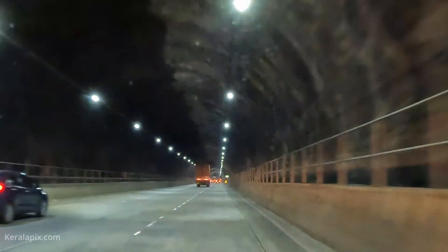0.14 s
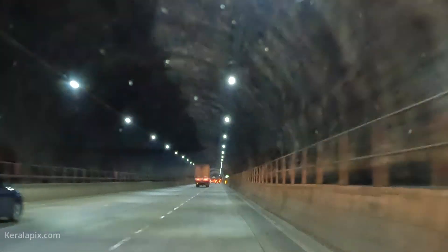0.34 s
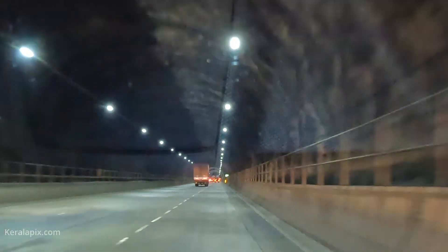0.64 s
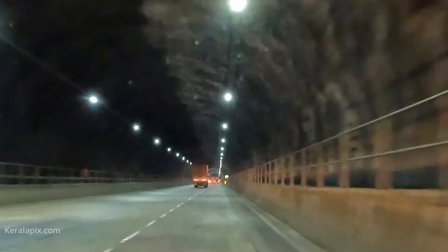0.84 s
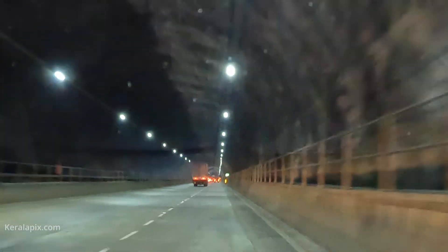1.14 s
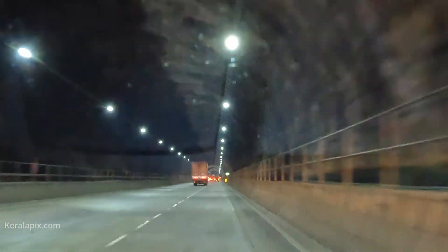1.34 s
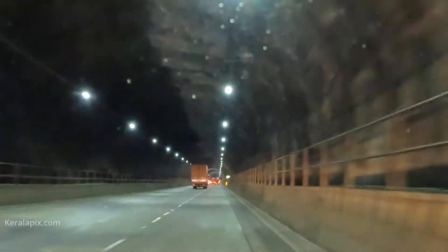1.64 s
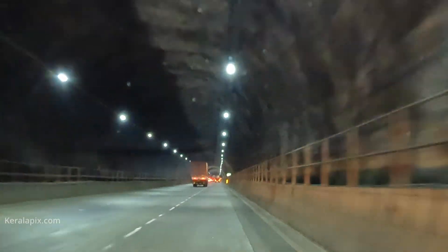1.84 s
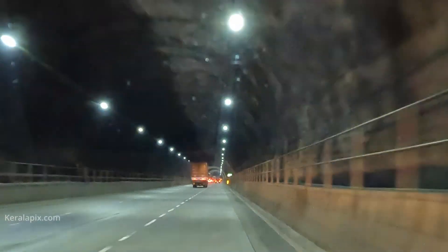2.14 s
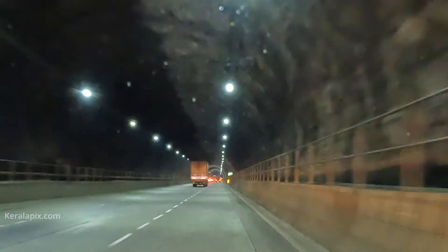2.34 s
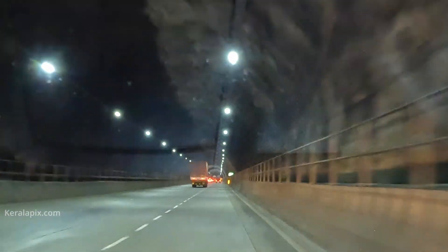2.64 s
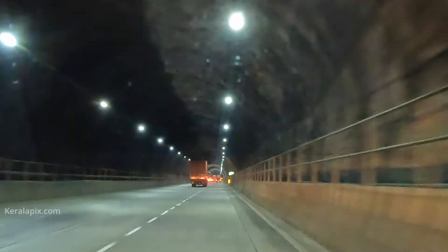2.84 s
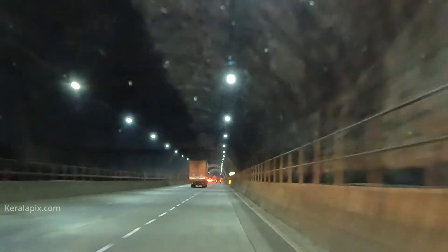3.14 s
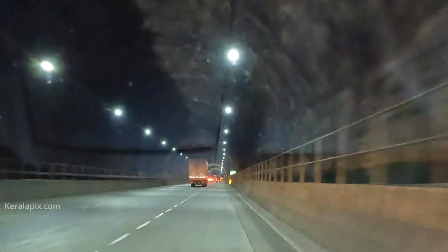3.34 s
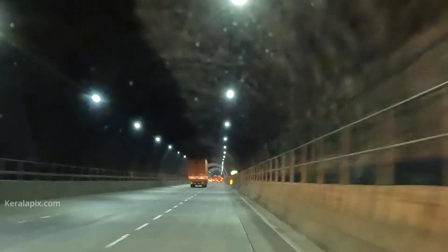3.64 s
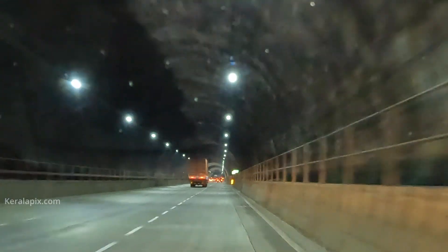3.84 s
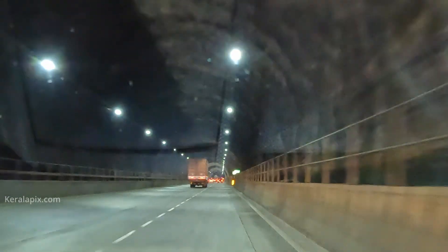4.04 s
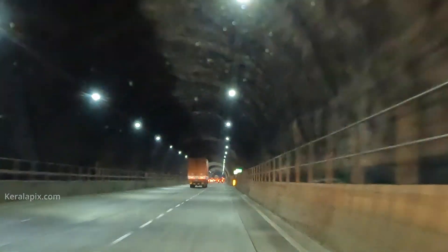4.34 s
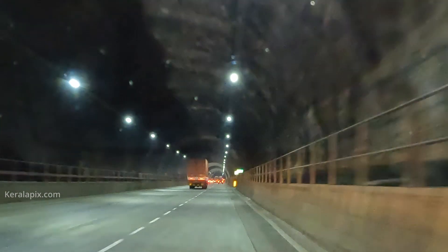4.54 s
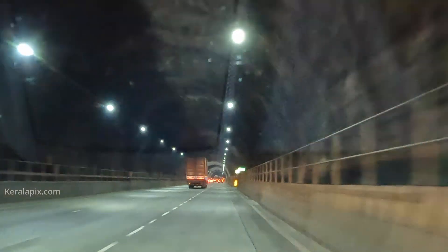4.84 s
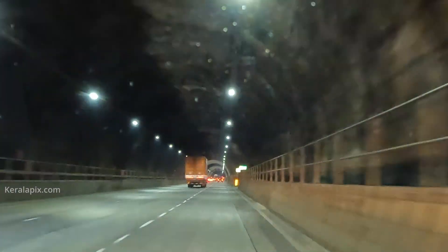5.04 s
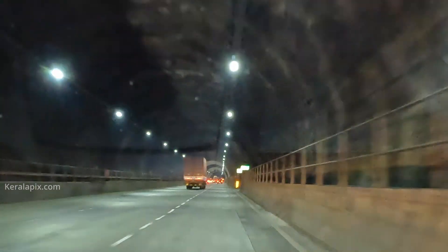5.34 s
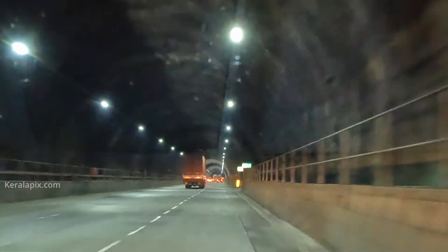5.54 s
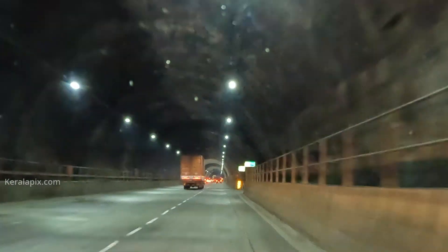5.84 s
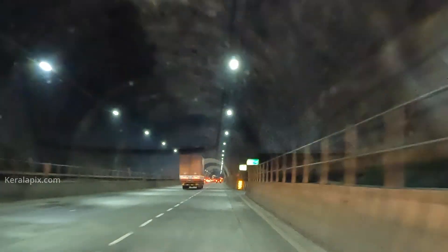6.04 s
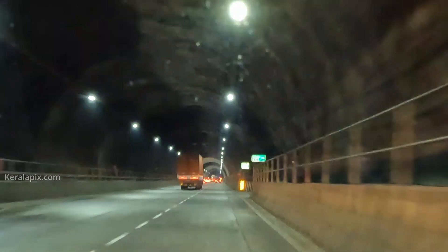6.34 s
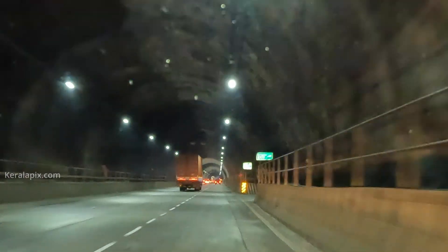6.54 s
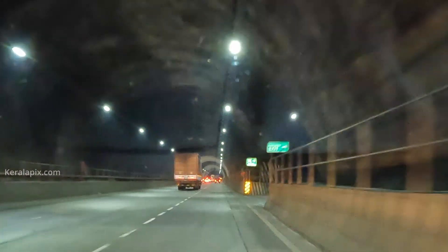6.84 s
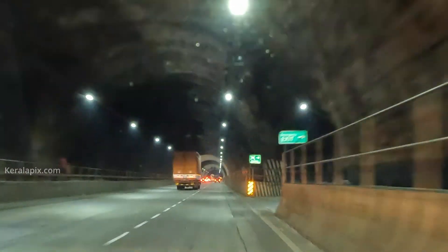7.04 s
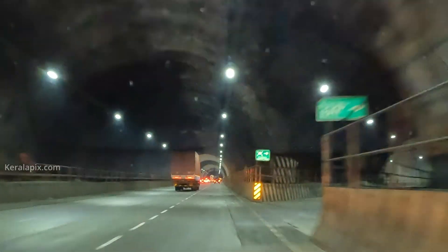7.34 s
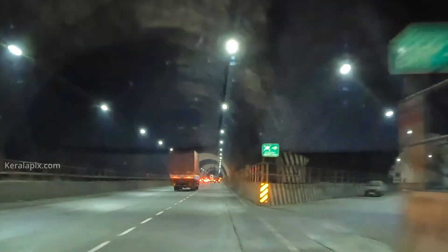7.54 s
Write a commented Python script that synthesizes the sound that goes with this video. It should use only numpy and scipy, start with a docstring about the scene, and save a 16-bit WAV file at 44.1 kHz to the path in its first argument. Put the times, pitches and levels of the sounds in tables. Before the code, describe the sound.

Heard from the dashboard of a car at steady speed in a tunnel. Heavy bass shudder and cabin boom swell over small bumps, with a thick tyre drone above. A muffled tunnel roar and soft hiss stay behind. Loose plastic trim chirps in very short, high, dry squeaks throughout, sometimes in rapid clusters.

```python
"""A car cruises through a road tunnel, heard inside: its body shakes on bumps and the cabin air booms.
A low hum rises and falls, and noise shaped by panel resonances makes the thrum and drone of the tyres.
Outside, the tunnel roars and hisses in bands of noise, with a faint whine that comes and goes.
Loose plastic trim chirps in short squeals with scraping noise, and nearby surfaces echo each chirp."""
import sys
import numpy as np
from scipy import signal
from scipy.fft import rfft, irfft
from scipy.io import wavfile
from scipy.ndimage import uniform_filter1d, minimum_filter1d

SR = 44100
rng = np.random.default_rng(int(sys.argv[2]) if len(sys.argv) > 2 else 0)


def generate_wav(sig):
    """Save sig (samples, or channels by samples) to the path in sys.argv[1] as 16-bit PCM at SR."""
    pcm = np.round(np.clip(np.atleast_2d(sig).T, -1, 1) * 32767).astype(np.int16)
    wavfile.write(sys.argv[1], SR, pcm)


N = 338684
TIME = np.arange(N) / SR
SIDES = np.array([[1], [-1]])  # left, right

# In spectrum tables only the shape counts: each noise is later set to its own level.
# bumps in the road, each a short swell of the body shake: time_s, rise_db (a minus is a dip)
BUMPS = [(.15, 3.5), (.49, 3.5), (1.25, 7), (1.71, 5.5), (2.06, 3), (2.43, -1.5), (3.8, -1), (3.97, 9),
         (4.95, 3.5), (5.21, 4.5), (5.59, 8), (6.04, 7.5), (6.6, 4), (6.779, 8), (7.38, 5.5), (7.62, 8)]
BUMP_S, SHAKE_DB = 0.085, -23.5  # width of a swell, shake level between bumps
# boom of the cabin air as the road shakes the body: time_s, level_db, pitch_hz
BOOM = [(0.0, -20, 45.95), (0.35, -18.5, 48), (0.45, -12.5, 43.28), (0.83, -19, 54.17), (1.12, -16, 44.32),
        (1.25, -29, 52.07), (1.44, -21.5, 55.88), (1.57, -10.5, 44.08), (1.68, -24, 46.84),
        (1.89, -13, 44.9), (2.03, -18.5, 46.16), (2.19, -16.5, 48.02), (2.37, -18, 46.93),
        (2.59, -13.5, 45.05), (2.65, -21.5, 48.05), (2.71, -13.5, 43.2), (2.85, -9.5, 41.03),
        (3.07, -12, 46.14), (3.31, -22.5, 51.96), (3.49, -13.5, 42.96), (3.73, -17, 45.84),
        (3.81, -27, 47.96), (3.86, -19.5, 47.1), (3.92, -24.5, 45.04), (4.03, -9, 45), (4.16, -19.5, 49.45),
        (4.27, -12, 45.1), (4.51, -19, 46.1), (4.61, -23.5, 53.93), (4.77, -20, 52.83), (4.86, -24.5, 51.8),
        (5.1, -12, 48.96), (5.2, -22, 53.2), (5.28, -20.5, 56.65), (5.36, -23, 58.17), (5.47, -13.5, 54.3),
        (5.57, -18, 44.02), (5.73, -16.5, 52.89), (6.03, -16, 45.17), (6.24, -14.5, 52.8),
        (6.35, -20, 46.85), (6.43, -14.5, 60.2), (6.59, -19, 60.84), (6.7, -21.5, 54.63),
        (6.85, -23.5, 47.2), (7.01, -17, 46.05), (7.28, -17, 55.17), (7.33, -18.5, 49.05),
        (7.49, -14.5, 52.65), (7.68, -21.0, 56.96)]
# low hum near 90 Hz: time_s, level_db
LOW_HUM = [(0, -25), (.3, -40.5), (.9, -30.5), (1.15, -34.5), (1.7, -29), (2.4, -36.5), (2.65, -31),
           (3.28, -28.5), (3.58, -45), (3.9, -29.5), (4.15, -33.5), (4.33, -20.5), (4.65, -33.5),
           (4.85, -27), (5.15, -37.5), (5.4, -28), (5.6, -33), (5.78, -24), (5.98, -37), (6.13, -18.5),
           (6.3, -39), (6.55, -27.5), (7.2, -33.5), (7.45, -41), (7.68, -24.5)]
# loose rumble of the suspension: frequency_hz, density_db (per Hz)
RUMBLE_SPECTRUM = [(30, -5), (38, 2), (45, -4.5), (55, -8), (66, -1), (78, -18)]
RUMBLE_DB = -8  # against the boom

# road surface under the tyres, before flutter and thumps: time_s, thrum_db, drone_db
SURFACE = [(0, -22, -31.5), (.55, -27, -34.5), (.8, -20, -31.5), (1.2, -22.5, -33), (1.6, -20, -32),
           (2.05, -26, -30.5), (2.6, -22.5, -34.5), (2.92, -26, -33), (3.3, -23.5, -33.5), (3.48, -27, -32),
           (3.87, -23, -31.5), (4.1, -24, -30.5), (4.42, -24.5, -30), (4.75, -20.5, -31),
           (5.1, -23.5, -29.5), (5.4, -21.5, -30), (5.92, -26.5, -32.5), (6.25, -21.5, -31.5),
           (6.6, -24.5, -32), (6.82, -27, -35.5), (7.25, -22.5, -29.5), (7.68, -26.5, -34.5)]
# rough patches that the tyres hit, each a brief thump: time_s, rise_db
THUMPS = [(.38, 3), (.75, 1.5), (1.35, 3), (1.52, 2), (1.74, 2.5), (2.3, 3), (2.64, 5), (3.14, 1), (3.3, 3),
          (3.84, 4), (4.27, 4), (4.63, 2), (4.87, 1.5), (5.36, 2), (5.73, 2), (6.23, 3.5), (7.48, 4)]
THUMP_S = 0.03
# low and higher tyre noise: frequency_hz, density_db (per Hz)
THRUM_SPECTRUM = [(32, -10.5), (66, 6.5), (80, 1), (100, 0), (120, -2), (145, -5.5), (180, -14),
                  (230, -37.5)]
DRONE_SPECTRUM = [(130, -32.5), (185, 2), (230, 1), (280, -1.5), (340, -3.5), (400, -10.5), (430, -13),
                  (500, -19.5), (700, -42.5)]
# panel resonances of the cabin: frequency_hz, width_hz, gain_db (a minus is a dip)
CABIN_MODES = [(99, 8.7, 2.5), (113.2, 3.3, 6.5), (134, 8.3, -3), (161, 38, 5.5), (209.6, 27, 4.5),
               (224, 15, -2), (252.3, 19, 5.5), (311, 22, 3), (353.2, 16, 6.5), (384.3, 12, 6.5),
               (458.4, 26, 6)]
# the air inside the tyres hums at two close pitches: time_s, lower_hum_db, upper_hum_db
HUMS = [(0, -40, -36.5), (.6, -41.5, -46), (1.0, -38, -48), (1.45, -34, -38.5), (1.9, -34.5, -43),
        (2.3, -39, -34.5), (3.2, -50.5, -42), (4.0, -46.5, -41.5), (4.45, -42, -33), (4.8, -32.5, -42),
        (5.2, -44.5, -43.5), (5.7, -36.5, -35), (6.1, -43, -48.5), (6.6, -50.5, -44), (7.68, -41, -41)]
# the road sets one panel humming now and then: time_s, level_db
PANEL = [(0, -53), (1.3, -53), (2.2, -50), (2.9, -43.5), (3.2, -50), (3.9, -39), (4.8, -43.5), (5.6, -42.5),
         (6.25, -46), (6.8, -50.5), (7.68, -46)]

# tyre noise that returns from the tunnel walls, before flutter: time_s, roar_db, hiss_db
TUNNEL = [(0.0, -47, -49.5), (0.09, -46.5, -50.5), (0.36, -45.1, -49.5), (0.47, -47.6, -50.0),
          (0.69, -45, -52.0), (0.79, -47.5, -52), (1.0, -44, -47.5), (1.18, -47, -51.5), (1.47, -43, -49.5),
          (2.02, -43.5, -48.6), (2.4, -44.5, -49.2), (2.65, -43, -50), (2.85, -45.5, -49),
          (3.08, -44, -51.5), (3.54, -46.5, -49.6), (3.68, -44, -49), (4.48, -44.8, -49),
          (5.13, -43, -48.6), (5.33, -45.5, -50.5), (5.47, -44, -48.5), (5.91, -46, -50.5),
          (6.19, -43.1, -50.5), (6.31, -45, -51), (6.41, -44.5, -51), (6.55, -47.5, -52.5),
          (6.89, -46, -50.5), (7.16, -44.6, -50.5), (7.3, -46.3, -49.5), (7.52, -45.5, -50.8),
          (7.67, -45, -49.5)]
# the tunnel's roar and hiss: frequency_hz, density_db (per Hz)
ROAR_SPECTRUM = [(300, -10.5), (450, 3), (620, 2.5), (790, -2.5), (920, 0), (1060, 2.5), (1200, -8),
                 (1500, -29.5)]
HISS_SPECTRUM = [(900, -20), (1150, 1), (1270, -1), (1400, -5.5), (1800, -9.5), (2050, -14), (2350, -19),
                 (3500, -27.5), (5000, -31.5), (6000, -41.5), (7400, -39.5), (9000, -50), (14000, -60.5)]
# windows and cabin colour the tunnel noise: frequency_hz, width_hz, gain_db (a minus is a dip)
WINDOW_MODES = [(910, 28, 3), (1010, 40, -3), (1270, 51, 1.5), (1500, 81, -1.5), (1600, 50, 3),
                (1835, 50, 2), (1900, 40, -4), (1980, 70, 3), (2270, 50, -1)]
# thin whine of the running gear: time_s, level_db
WHINE = [(0, -51), (.5, -56.5), (.8, -69), (1.9, -56.5), (2.6, -52.5), (3.1, -50), (3.93, -53),
         (4.05, -71.5), (6.7, -65.5), (7.0, -51.5), (7.16, -64), (7.33, -50.5), (7.68, -52.5)]
# the whine creeps up in pitch and levels off
WHINE_START_HZ, WHINE_END_HZ, WHINE_SETTLE_S = 1060, 1105, 1.7

# soft rubbing of the trim between squeaks, before its uneven grip: time_s, level_db
RUBBING = [(0, -85), (.25, -72), (.52, -66), (.72, -72), (1.03, -66), (1.3, -72), (1.68, -68), (2.1, -78.5),
           (2.45, -79), (2.78, -67.5), (3.4, -74.5), (3.62, -66), (3.85, -80.5), (4.45, -70), (4.8, -77),
           (5.55, -70), (5.85, -76.5), (6.15, -69.5), (7.68, -73)]
# broad hiss of trim sliding without catching: frequency_hz, density_db (per Hz)
RUB_SPECTRUM = [(900, -9.5), (1700, 12), (2900, 3.5), (5000, -0.5), (7500, -10), (8500, -13),
                (12000, -16.5), (15000, -33)]
# squeaks of the trim, timed at their strongest point: time_s, squeal_db, scrape_db, pitch_hz
SQUEAKS = [(0.3, -46.7, -56.0, 3620.0), (0.3236, -49, -51, 3360.0), (0.3742, -49.7, -54.0, 3630.0),
           (0.3941, -48, -48, 3460.0), (0.4152, -49, -53.5, 3460), (0.4642, -46.7, -48.5, 3480),
           (0.4879, -50, -50.5, 3420.0), (0.5611, -56, -57, 3440.0), (0.6346, -57.5, -58.5, 3480.0),
           (0.681, -54, -56.0, 3610.0), (0.7239, -57, -56, 3520.0), (0.7471, -56, -60.0, 3480),
           (0.7715, -58, -58, 3400.0), (0.8163, -54, -53.5, 3500.0), (0.84, -50.2, -56.0, 3440),
           (0.8862, -51.5, -58.0, 3550.0), (0.9056, -52, -56, 3550.0), (0.955, -45, -52.5, 3370),
           (0.9754, -60, -55, 3560.0), (1.0078, -62.0, -54.5, 3310.0), (1.0516, -52.0, -56, 3440.0),
           (1.0733, -61.0, -56, 3340), (1.1234, -60.5, -54.0, 3450.0), (1.1925, -48, -51.5, 3630.0),
           (1.2612, -51.5, -59.5, 3580.0), (1.3371, -52, -57, 3690.0), (1.3652, -48, -58.0, 3580),
           (1.41, -54, -57.0, 3550.0), (1.4338, -49.7, -55.5, 3560.0), (1.5041, -49, -51.5, 3530),
           (1.5786, -53, -55.5, 3530.0), (1.5987, -58.5, -54, 3530), (1.622, -47.2, -56.0, 3550.0),
           (1.646, -45, -48.0, 3400), (1.668, -54, -47.5, 3590.0), (1.6923, -52.0, -59, 3600.0),
           (1.7393, -54, -59, 3550.0), (1.7573, -55.5, -57.0, 3530.0), (1.778, -48, -55, 3590.0),
           (1.8058, -55, -60.0, 3600.0), (1.8727, -49, -53, 3300.0), (1.9205, -53.5, -58.0, 3510.0),
           (1.941, -50, -58.5, 3610.0), (1.9615, -51.7, -61.5, 3560.0), (1.9845, -54.5, -60.5, 3580.0),
           (2.0082, -55, -59.5, 3490.0), (2.1423, -51.5, -58.0, 3560.0), (2.1831, -53, -53, 3390.0),
           (2.21, -51.2, -53, 3410.0), (2.252, -47, -56, 3570.0), (2.353, -49, -53.5, 3610.0),
           (2.4974, -46, -49, 3600), (2.5642, -48, -53.5, 3560.0), (2.5931, -52.5, -51.5, 3410.0),
           (2.666, -48, -54, 3540.0), (2.69, -59.5, -52.5, 3550.0), (2.7108, -62.5, -57.5, 3570.0),
           (2.7365, -53.5, -50, 3440.0), (2.7606, -63.5, -58, 3650.0), (2.7826, -54.0, -62.0, 3580.0),
           (2.8079, -54.0, -58.5, 3620.0), (2.832, -54.5, -58, 3600.0), (2.8538, -46.7, -54, 3350.0),
           (2.875, -62.5, -55.5, 3600.0), (2.8969, -52.5, -56.5, 3530.0), (2.922, -47, -49, 3440.0),
           (2.9474, -49, -48.5, 3470.0), (2.9922, -54, -63, 3540.0), (3.0143, -61.0, -58.5, 3520.0),
           (3.0373, -51.7, -60, 3580.0), (3.0594, -52.5, -58.5, 3530.0), (3.1054, -52, -59, 3570.0),
           (3.1261, -56, -60.0, 3550.0), (3.147, -53.5, -56.5, 3300.0), (3.1698, -58.0, -57.5, 3510.0),
           (3.194, -49.7, -52.5, 3330), (3.2386, -52.5, -66.0, 3560.0), (3.261, -48, -52.5, 3470),
           (3.3349, -50, -55, 3610.0), (3.3744, -46.2, -52, 3550), (3.5196, -47.2, -49.5, 3390.0),
           (3.5448, -61.0, -55, 3380.0), (3.5665, -60, -60, 3530.0), (3.5899, -48.5, -52, 3300),
           (3.614, -55.0, -56, 3430.0), (3.6378, -62, -59, 3520.0), (3.7066, -51.7, -60.5, 3580.0),
           (3.7787, -51.7, -57, 3650.0), (3.7985, -53.0, -54.5, 3540.0), (3.8461, -51.5, -60, 3580.0),
           (4.0614, -43.5, -49.5, 3400), (4.1058, -50.7, -58, 3620.0), (4.1988, -50.2, -55, 3630.0),
           (4.2815, -48.7, -54, 3590.0), (4.3488, -43.7, -47, 3500), (4.3719, -55.0, -56, 3540.0),
           (4.4207, -47, -48.5, 3500.0), (4.4443, -50.2, -57.0, 3580.0), (4.4655, -49.2, -58.5, 3590.0),
           (4.4917, -51.7, -57.5, 3530.0), (4.5131, -51.7, -57, 3600.0), (4.5353, -53.0, -62.0, 3550.0),
           (4.561, -55.0, -56.0, 3530.0), (4.5826, -52, -57, 3580.0), (4.7439, -48, -55.0, 3730),
           (4.77, -49.7, -56.5, 3570), (4.9197, -48.5, -55, 3630), (5.1288, -46, -49, 3580.0),
           (5.2011, -47.5, -52, 3590), (5.2243, -50.2, -53, 3360.0), (5.3778, -46, -52, 3520.0),
           (5.4473, -49, -52.5, 3540.0), (5.4717, -52.5, -55.5, 3650.0), (5.4897, -56.5, -51, 3650.0),
           (5.5123, -48.2, -52, 3350), (5.5366, -54.5, -50.5, 3440.0), (5.5607, -55.0, -61, 3500.0),
           (5.5804, -54, -59, 3510.0), (5.6075, -54, -57, 3550.0), (5.649, -52.5, -55, 3660.0),
           (5.6751, -55.0, -59.0, 3540.0), (5.72, -57, -64, 3500.0), (5.7608, -50, -57.0, 3540.0),
           (5.7836, -51, -57, 3540.0), (5.9431, -54.0, -55, 3540.0), (5.9639, -53, -50.5, 3740.0),
           (5.9882, -64.0, -54.5, 3700.0), (6.0708, -54, -51.5, 3440), (6.0954, -59.5, -53, 3620.0),
           (6.118, -58, -55, 3550), (6.1412, -57.5, -55, 3440.0), (6.1912, -55.5, -62.0, 3480.0),
           (6.2117, -56.0, -61.0, 3620.0), (6.2328, -62, -57.0, 3550.0), (6.33, -51, -57, 3450.0),
           (6.4071, -50, -53.5, 3350), (6.5119, -49, -55.5, 3590.0), (6.5583, -56.0, -54, 3590.0),
           (6.6052, -54.0, -59, 3440.0), (6.6804, -49.5, -54, 3600), (6.7524, -47, -53, 3390.0),
           (6.8237, -52, -54.0, 3650), (6.8677, -52.5, -60, 3580.0), (6.9343, -49.2, -54.5, 3550.0),
           (7.002, -49, -55, 3530), (7.0764, -47.5, -51.5, 3580), (7.3898, -51, -53.5, 3620),
           (7.4182, -48.2, -54, 3550.0), (7.4578, -52, -51.5, 3460.0), (7.5927, -52, -56.0, 3550)]
# noise in each slip: frequency_hz, density_db (per Hz)
SCRAPE_SPECTRUM = [(1800, -14.5), (2400, 2.5), (2900, 5), (3300, 4.5), (3850, 5), (4050, 4), (4350, -2.5),
                   (4850, 3.5), (5400, -6.5), (7200, -11.5), (7900, -4.5), (8300, -19.5), (11000, -18.5),
                   (13500, -25.5), (15000, -38)]
SLIP_S, SLIP_VARIES = .00098, .2  # typical half-width of a slip, and the share by which it varies
# weak slips between squeaks, against the rubbing: lowest_db, highest_db
CHATTER_DB = (2.5, 11.5)
SLIPS_PER_S = 43  # weak slips tried each second
CHATTER_LIMIT_DB = -69.5  # weak slips stop growing once the rubbing is this strong
HOLD_S = .017  # no weak slip this close to a squeak
# a sharper plastic tick: start_s, level_db
TICKS = [(4.988, -50)]
# its ring, against the tick's level: pitch_hz, level_db, t60_s (time to fall 60 dB)
TICK_MODES = [(3950, 0, 0.032), (4660, -11, .022), (5040, -13, .02), (6100, -19, .018), (7000, -15, .015)]
# the snap that starts it: frequency_hz, density_db (per Hz)
SNAP_SPECTRUM = [(2000, -24.5), (3400, -7.5), (3950, 2), (5400, -1.5), (6100, -1.5), (7900, -3),
                 (8700, -11), (14000, -26.5)]
# trim reflections from windscreen, dashboard and roof, against one another: delay_s, level_db
ECHOES = [(.00299, 0), (.0053, -15), (.0084, -11), (.0095, -17)]
CABIN_T60_S, TAIL_DRIFT_HZ = .05, 3.3  # short, dry ring of the cabin; how fast its pattern drifts

# how alike the two microphones are: frequency_hz, likeness (0 to 1)
LIKENESS = [(60, .995), (120, .995), (175, .975), (240, .988), (330, .93), (600, .85), (1200, .78),
            (2500, .62), (6000, .58), (12000, .68)]
# left microphone minus right: frequency_hz, difference_db
TILT = [(60, 1), (150, -0.8), (380, -1), (950, -2.5), (2380, -1.1), (5980, -1), (15000, -2)]
# how far the left microphone leads in phase: frequency_hz, lead_radians
LEAD = [(120, .01), (175, .07), (240, -.04), (350, 0), (460, .3), (780, .05), (1000, .3), (1250, .15),
        (1600, .45), (2700, .6), (4200, 0)]
EDGE_HZ = 14500  # top of the sound's frequency range


def amp(db):
    """Turns decibels into a gain."""
    return 10 ** (np.asarray(db) / 20)


def unit(x):
    """Scales a sound to an average (rms) strength of 1."""
    return x / np.sqrt(np.mean(x ** 2) + 1e-20)


def curve(rows, axis=1):
    """Draws straight lines through one column of a time table, giving a value for every sample."""
    rows = np.asarray(rows)
    return np.interp(TIME, rows[:, 0], rows[:, axis])


def spectrum(points, hz):
    """Reads a frequency table along a log-frequency axis."""
    table_hz, value = np.transpose(points)
    return np.interp(np.log(hz + 1), np.log(table_hz), value)


def add(mix, s, sound):
    """Mixes a sound into both channels at time s."""
    part = mix[:, max(round(s * SR), 0):][:, :sound.shape[-1]]
    part += sound[..., :part.shape[1]]


def flutter(rate_hz):
    """Makes a slow random wander of rms 1, fading out above a given rate."""
    hz = np.fft.rfftfreq(N, 1 / SR)
    slow = np.exp(-(hz / rate_hz) ** 2) * (hz > 1)
    return unit(irfft(rfft(rng.standard_normal(N)) * slow, N))


def swells(rows, width_s):
    """Adds up short bell-shaped rises, in dB."""
    return sum(rise_db * np.exp(-((TIME - s) / width_s) ** 2) for s, rise_db in rows)


def cabin_noise(shape, modes=()):
    """Noise from all around, with a spectrum and resonances, as two close microphones hear it."""
    hz = np.fft.rfftfreq(N, 1 / SR)
    high_cut = 1 + (hz / shape[-1][0]) ** 4
    low_cut = 1 + (shape[0][0] / (hz + 1)) ** 4
    gain = amp(spectrum(shape, hz)) / high_cut / low_cut
    for mode_hz, width, db in modes:
        gain = gain * amp(db / (1 + (2 * (hz - mode_hz) / width) ** 2))
    common, apart = rfft(rng.standard_normal((2, N)))
    same = np.clip(spectrum(LIKENESS, hz), 0, 1)
    pair = np.sqrt(1 + same) * common + SIDES * np.sqrt(1 - same) * apart
    level_split = amp(SIDES * spectrum(TILT, hz) / 2)
    phase_split = np.exp(.5j * SIDES * spectrum(LEAD, hz))
    return unit(irfft(pair * gain * level_split * phase_split, N))


def sway(hz, width_hz, steadiness, apart):
    """A randomly driven resonance at two microphones; steadiness 0-1 evens out its beats."""
    offset = np.fft.fftfreq(N, 1 / SR)
    band = np.exp(-(offset / width_hz) ** 2)
    noise = rng.standard_normal((2, N)) + 1j * rng.standard_normal((2, N))
    drift, stray = np.fft.ifft(noise * band)
    drift = drift / abs(drift) ** np.clip(steadiness, 0, 1)
    # evening out adds sharp corners, so smooth them
    drift = np.fft.ifft(np.fft.fft(drift) * np.exp(-(offset / (2 * width_hz)) ** 4))
    turn = np.exp(2j * np.pi * np.cumsum(hz * np.ones(N)) / SR)
    return unit((drift * turn).real) + apart * SIDES * unit((stray * turn).real)


def body():
    """Bumps shake the body on its mounts and the cabin booms; a 90 Hz hum and loose rumble add low notes."""
    shake_db = SHAKE_DB + swells(BUMPS, BUMP_S)
    shake = amp(shake_db) * sway(hz=27.52, width_hz=8, steadiness=0.85, apart=.035)
    boom = amp(curve(BOOM)) * sway(hz=curve(BOOM, axis=2), width_hz=10, steadiness=0.77, apart=0.033)
    low_hum = amp(curve(LOW_HUM)) * sway(hz=90.35, width_hz=4.0, steadiness=0.28, apart=.04)
    rumble = amp(curve(BOOM) + RUMBLE_DB) * cabin_noise(RUMBLE_SPECTRUM)
    return (shake + boom + low_hum + rumble) * amp(-.15 * SIDES)


def tyres():
    """The uneven grain of the road rings the cabin panels and the air inside the tyres."""
    patches_db = 0.78 * flutter(rate_hz=29) + swells(THUMPS, THUMP_S)
    thrum = amp(curve(SURFACE, axis=1) + patches_db) * cabin_noise(THRUM_SPECTRUM, CABIN_MODES)
    drone = amp(curve(SURFACE, axis=2) + patches_db) * cabin_noise(DRONE_SPECTRUM, CABIN_MODES)
    lower = amp(curve(HUMS, axis=1)) * sway(hz=211.8, width_hz=7.3, steadiness=0.55, apart=.06)
    upper = amp(curve(HUMS, axis=2)) * sway(hz=250.6, width_hz=7.5, steadiness=0.31, apart=.05)
    panel = amp(curve(PANEL)) * sway(hz=359.2, width_hz=8, steadiness=0.75, apart=.12)
    return thrum + drone + (lower + upper + panel) * amp([[-.5], [.5]])


def tunnel():
    """The roar and hiss of the tunnel, dulled by the windows, with a fuzzy whine."""
    roar_db = curve(TUNNEL, axis=1) + .5 * flutter(rate_hz=20)
    roar = amp(roar_db) * cabin_noise(ROAR_SPECTRUM, WINDOW_MODES)
    hiss_db = curve(TUNNEL, axis=2) + .5 * flutter(rate_hz=27)
    hiss = amp(hiss_db) * cabin_noise(HISS_SPECTRUM, WINDOW_MODES)
    whine_hz = WHINE_END_HZ + (WHINE_START_HZ - WHINE_END_HZ) * np.exp(-TIME / WHINE_SETTLE_S)
    whine = amp(curve(WHINE)) * sway(hz=whine_hz, width_hz=21, steadiness=.3, apart=.25)
    return roar + hiss + whine * amp([[-1.2], [.8]])


def chirp(squeal_db, scrape_db, hz):
    """One slip of plastic on plastic: a few cycles of squeal and a burst of scrape, in stereo."""
    t = np.arange(512) / SR
    # a slower slip spreads the same energy over more time
    stretch = np.exp(SLIP_VARIES * rng.standard_normal())
    swell = np.exp(-((t - .003) / (SLIP_S * stretch)) ** 2) / np.sqrt(stretch)
    squeal = swell * np.sin(2 * np.pi * hz * t + .2 * SIDES)
    colour = amp(spectrum(SCRAPE_SPECTRUM, np.fft.rfftfreq(len(t), 1 / SR)))
    common, side = rng.standard_normal((2, len(t)))
    grit = rfft(swell * (common + .5 * SIDES * side))
    even_grit = grit / np.sqrt(abs(grit))  # softens the random peaks of its spectrum
    scrape = unit(irfft(colour * even_grit)) * np.sqrt(np.mean(swell ** 2))
    return amp(squeal_db) * squeal + amp(scrape_db) * scrape


def tick(snap_s, snap_db):
    """A dry snap of noise sets a small plastic part ringing in fading sine waves."""
    t = np.arange(SR // 16) / SR
    ring = sum(amp(db - 60 * t / t60) * np.sin(2 * np.pi * hz * t) for hz, db, t60 in TICK_MODES)
    colour = amp(spectrum(SNAP_SPECTRUM, np.fft.rfftfreq(len(t), 1 / SR)))
    snap = unit(irfft(rfft(rng.standard_normal((2, len(t)))) * colour, len(t)))
    fade_in = 1 - np.exp(-t / .0015)
    return (ring + amp(snap_db) * snap * np.exp(-t / snap_s)) * fade_in


def cabin(x, tail_db, t60, echo_db):
    """Near glass returns a few hard echoes; seats soak up the rest in a short ring that drifts."""
    t = np.arange(SR // 10) / SR
    echoes = sum(amp(db + echo_db) * np.sinc((t - delay) * SR) for delay, db in ECHOES)
    hard = np.sinc(t * SR) + echoes  # direct sound first
    out = signal.fftconvolve(x, hard[None], axes=1)[:, :N]
    after_first_echo = t > ECHOES[0][0]
    tails = rng.standard_normal((4, 2, len(t))) * amp(-60 * t / t60) * after_first_echo
    # four tails trade places over time, so slips ring differently
    turn = 2 * np.pi * TAIL_DRIFT_HZ * TIME
    shares = np.array([np.cos(turn), np.sin(turn), np.cos(np.e * turn), np.sin(np.e * turn)]) / np.sqrt(2)
    for share, tail in zip(shares, tails):
        even_tail = tail / np.linalg.norm(tail[0])
        out += amp(tail_db) * signal.fftconvolve(x * share, even_tail, axes=1)[:, :N]
    return out


def trim():
    """Loose trim catches and slips in squeaks and ticks; while it rubs, it chatters weakly."""
    rubbing_db = curve(RUBBING)
    grain = unit(uniform_filter1d(rng.standard_normal(N), size=300))  # sliding grips unevenly
    dry = amp(rubbing_db + 2 * grain) * cabin_noise(RUB_SPECTRUM)
    lead_s = .003  # a chirp is strongest this long after it starts
    for s, squeal_db, scrape_db, hz in SQUEAKS:
        add(dry, s - lead_s, chirp(squeal_db, scrape_db, hz))
    for s in np.arange(.02, N / SR - .02, 1 / SLIPS_PER_S):
        above_rubbing_db = np.interp(rng.random(), [0, 1], CHATTER_DB)
        db = above_rubbing_db + min(rubbing_db[int(s * SR)], CHATTER_LIMIT_DB)
        slip = chirp(db, db - 8.5, hz=3580 * (1 + 0.035 * rng.standard_normal()))
        free = min(abs(s - row[0]) for row in SQUEAKS) > HOLD_S
        add(dry, s - 2 * lead_s * rng.random(), free * slip)
    for s, db in TICKS:
        add(dry, s, amp(db) * tick(snap_s=0.0036, snap_db=0.5))
    return cabin(dry, tail_db=1.5, t60=CABIN_T60_S, echo_db=1.25) * amp([[-.7], [.7]])


def scene():
    """Adds up everything that reaches the dashboard."""
    return body() + tyres() + tunnel() + trim()


def record(dry):
    """A limiter turns only the bass down around loud peaks; then a filter removes the very top."""
    bass = signal.sosfiltfilt(signal.butter(2, 160, fs=SR, output="sos"), dry)
    room = np.minimum(amp(-7.6) / (abs(dry).max(0) + 1e-9), 1)  # gain that would hold peaks to -7.6 dB
    gain = uniform_filter1d(minimum_filter1d(room, size=1200), size=1000)
    limited = dry + (gain - 1) * bass
    band_limit = signal.firwin(255, EDGE_HZ, window=("kaiser", 9), fs=SR)
    return signal.oaconvolve(limited, band_limit[None], "same")


dry = scene()
out = record(dry)
generate_wav(out)
```